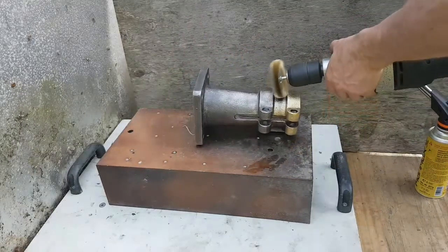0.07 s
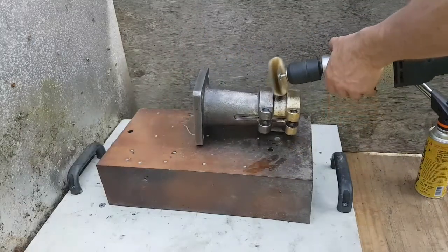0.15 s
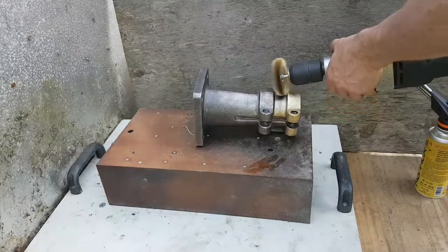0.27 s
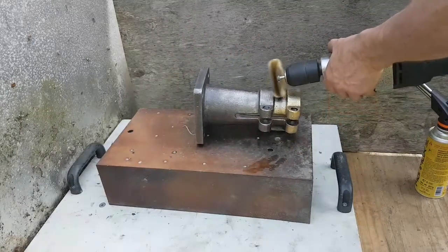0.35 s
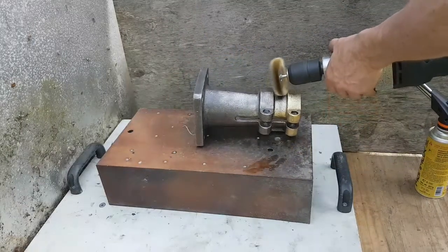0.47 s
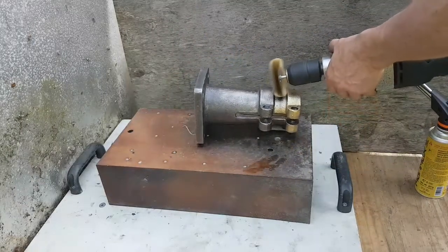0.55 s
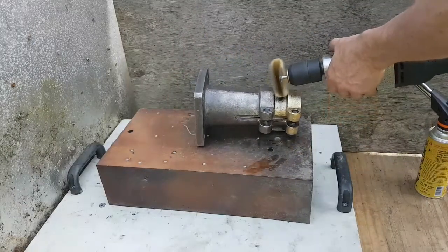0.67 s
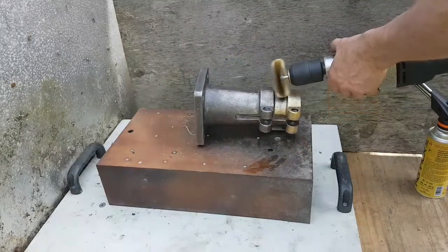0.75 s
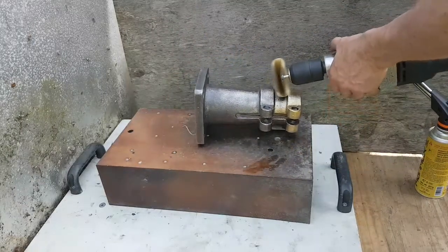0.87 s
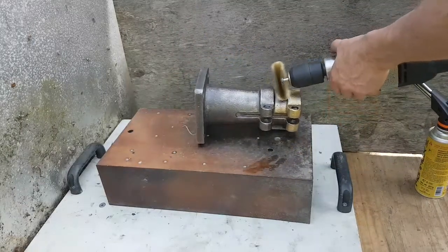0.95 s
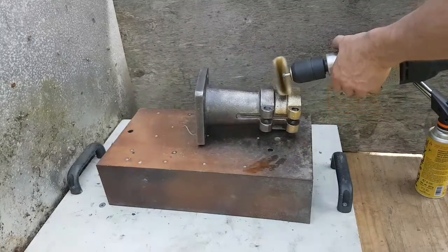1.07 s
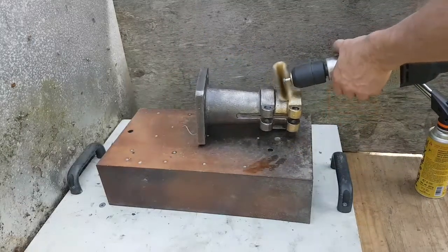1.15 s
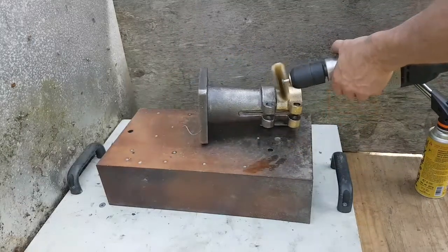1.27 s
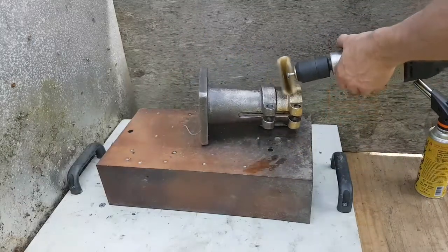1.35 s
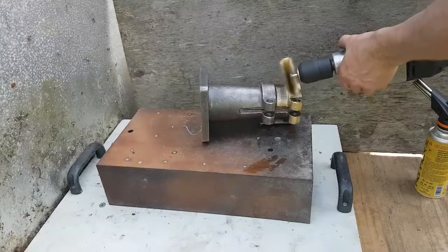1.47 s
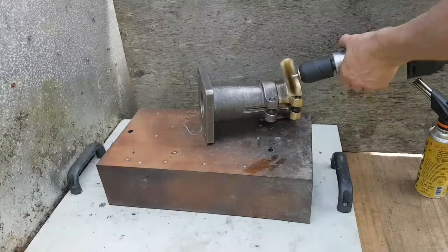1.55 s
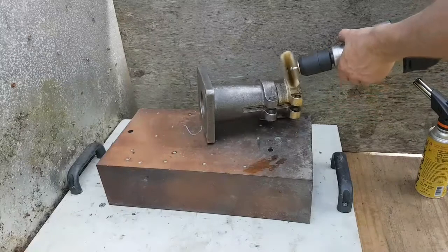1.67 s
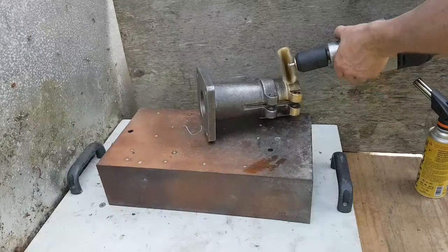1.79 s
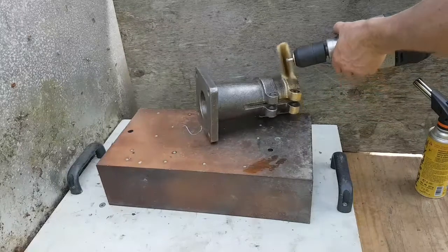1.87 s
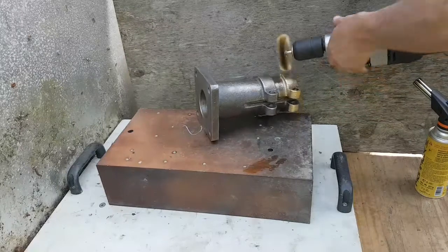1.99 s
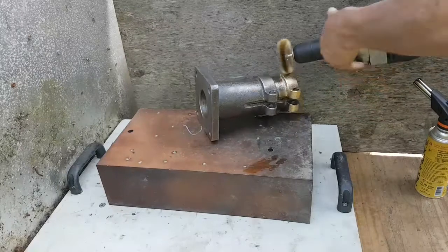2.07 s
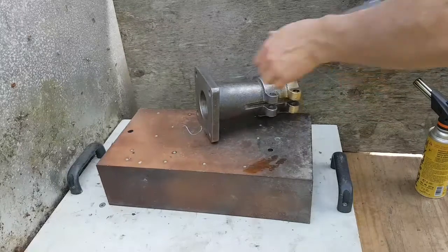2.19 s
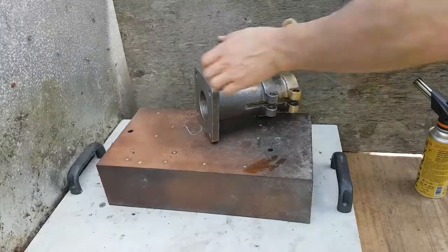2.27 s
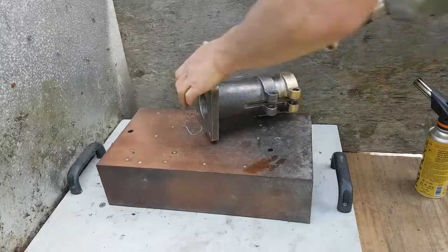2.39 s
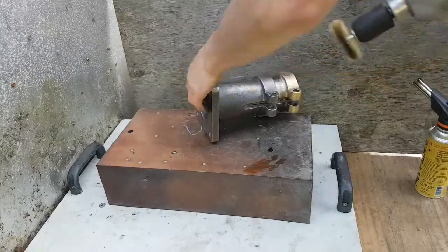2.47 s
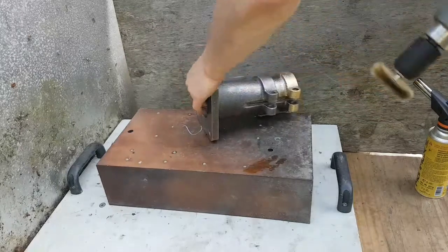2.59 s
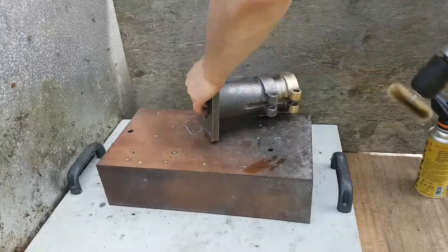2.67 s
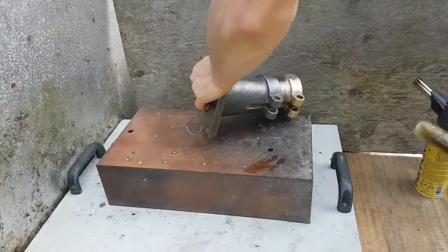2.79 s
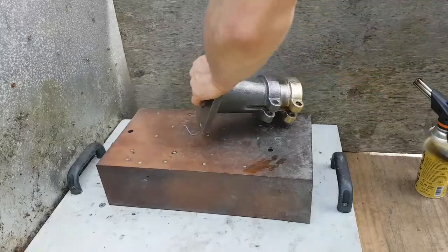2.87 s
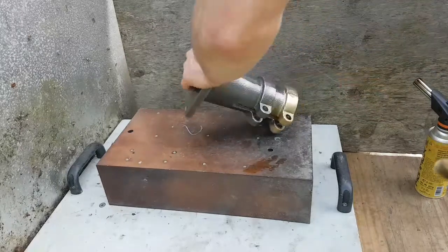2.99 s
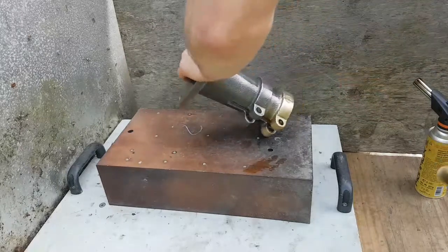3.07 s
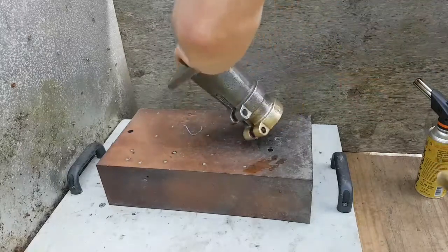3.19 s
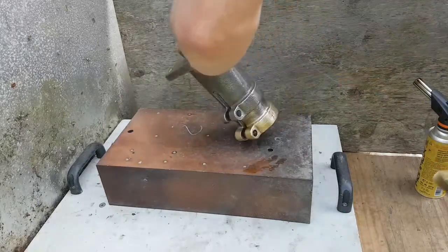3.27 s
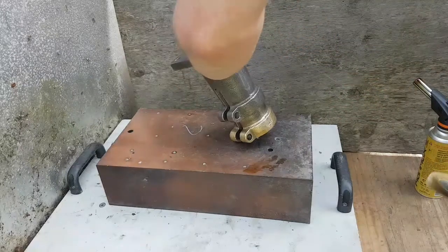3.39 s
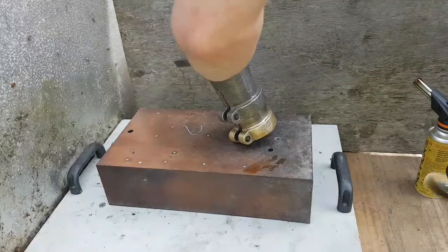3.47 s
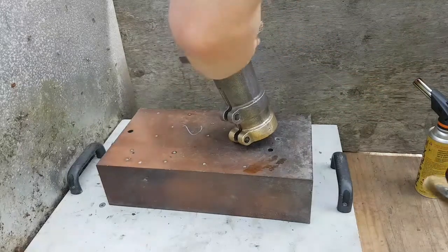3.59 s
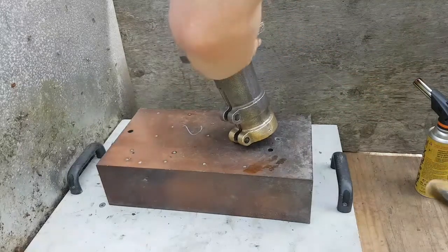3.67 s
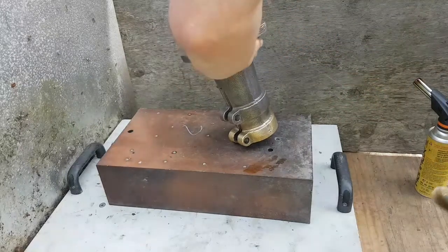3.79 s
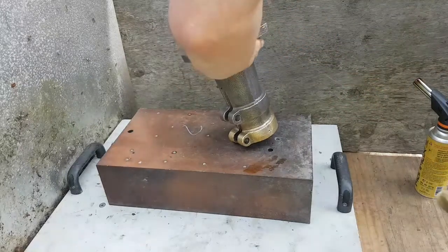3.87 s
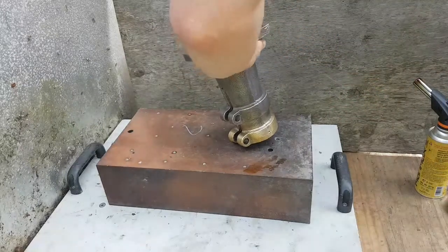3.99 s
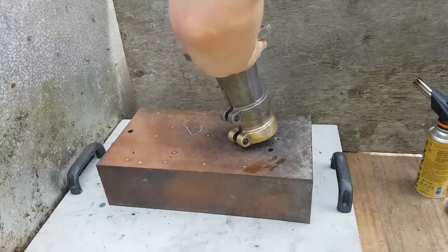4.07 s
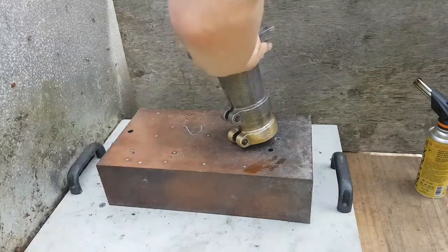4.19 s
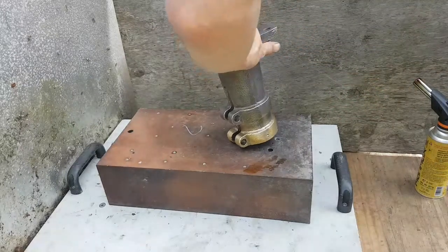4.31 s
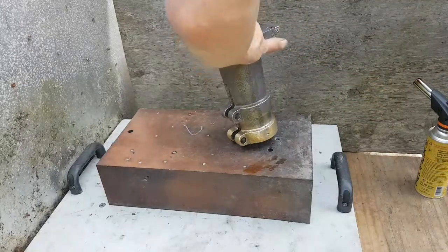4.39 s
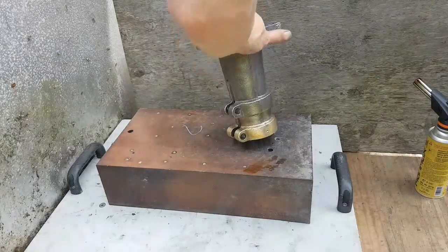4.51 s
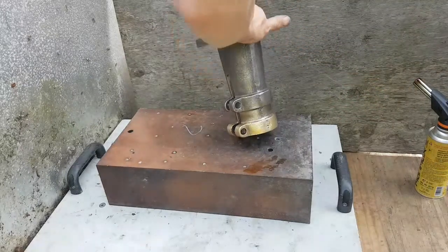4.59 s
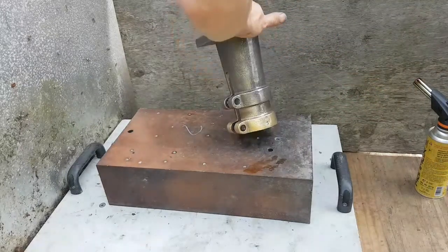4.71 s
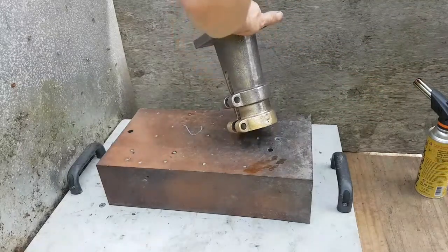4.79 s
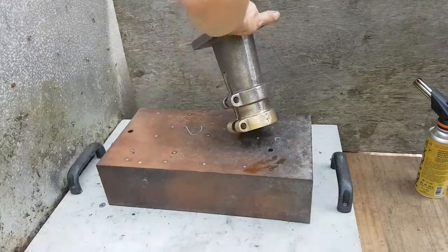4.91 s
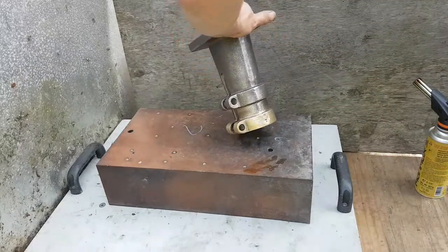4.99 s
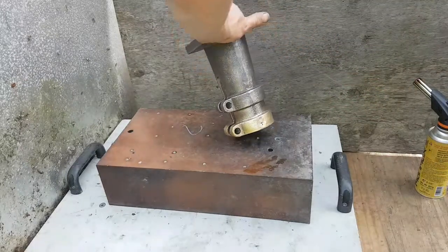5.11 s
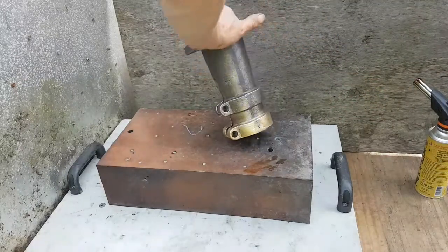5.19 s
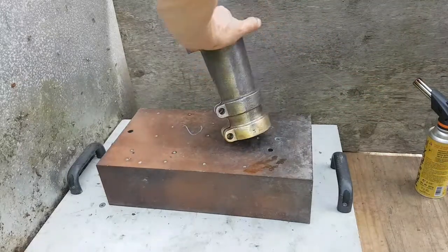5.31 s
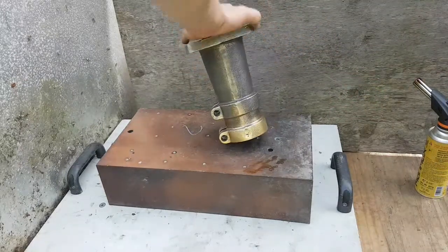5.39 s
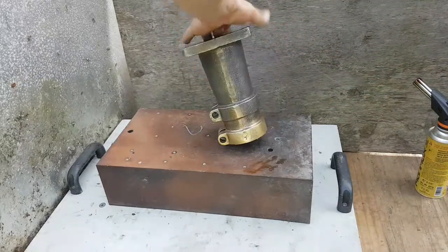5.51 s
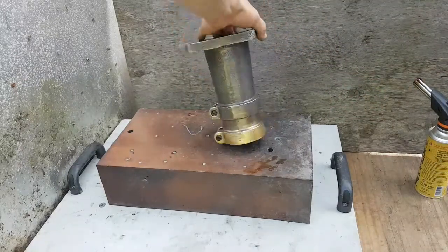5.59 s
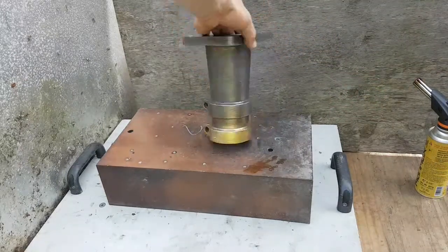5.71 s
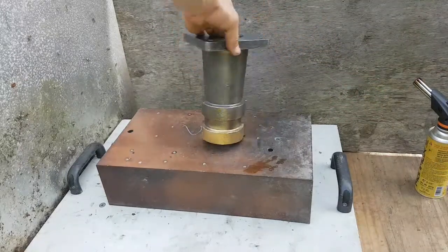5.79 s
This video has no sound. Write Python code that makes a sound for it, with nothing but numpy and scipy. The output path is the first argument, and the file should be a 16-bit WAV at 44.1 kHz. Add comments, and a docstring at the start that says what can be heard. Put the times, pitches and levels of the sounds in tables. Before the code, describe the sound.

From 0 to about 2 s a corded electric drill, right of a close stereo pair, runs at high speed: a piercing whine, a roaring motor and broad hissing air, its pitch sagging slightly whenever the wheel is pressed on. Wire tips rasp on a steel sleeve, which knocks dully against a hollow block, in a fast clatter until 0.65 s, then in scattered thuds, with a tight cluster near 1.9 s. At about 2.1 s the motor is released and glides steadily down, stopping near 4.2 s. Over it, the sleeve scrapes gritty and low from 1.9 to 3.8 s, with thumps near 2.8 and 3.25 s and a brief squeak around 3.3 s. Then the shop is nearly quiet, with faint taps and soft rubbing from 4.6 to 5.3 s. At 5.5, 5.64 and 5.77 s the rim lands with dull cracks, short scrapes and a metallic ring quickly damped. Short hard-walled reverberation.

```python
"""A corded drill whines and roars, its wire wheel rasping on a steel sleeve that thuds on a hollow block, right of
a pair of microphones. The trigger is let go, the motor coasts to rest while the drill is laid aside, and a hand
tips the sleeve up, drags it and stands it on end. Motor tones are sines locked to the turn rate, air and scraping
are coloured noise, wire ticks and blows excite decaying resonances."""
import sys
import numpy as np
from scipy import signal
from scipy.fft import rfft, irfft, next_fast_len
from scipy.io import wavfile
from scipy.ndimage import uniform_filter1d, map_coordinates

SR = 44100
rng = np.random.default_rng(int(sys.argv[2]) if len(sys.argv) > 2 else 0)


def wav_out(sig):
    """Save sig, one row per channel (or a flat mono array), as 16-bit PCM at SR to the path in sys.argv[1]."""
    wavfile.write(sys.argv[1], SR, np.round(np.clip(np.atleast_2d(sig).T, -1, 1) * 32767).astype(np.int16))


N = 257979

# colour of sleeve scraping: freq_hz, density_db (relative, per Hz)
SCRAPE_COLOUR = [(100, -12.5), (210, 5), (350, 2), (700, -17), (1000, -27), (3000, -62.5)]
# wires on the sleeve: time_s, level_db
BRUSHING_LEVEL = [(0, -29), (1.0, -26.5), (1.55, -29), (1.85, -32), (2.3, -84.5)]
# armature coasting after the trigger is let go: time_s, speed_turns_per_s
COAST_SPEED = [(2.07, 394), (2.2, 365.5), (2.8, 242.5), (3.0, 205), (3.52, 115), (3.77, 61.5), (3.89, 42),
               (4.18, 5), (4.22, 0)]


def amp(db):
    """Decibels to gain."""
    return 10 ** (np.asarray(db, float) / 20)


def rms_one(x):
    """Scale to unit rms."""
    return x / np.sqrt(np.mean(x ** 2) + 1e-20)


def in_time(rows):
    """Interpolate each column of a time table, sample by sample."""
    time_s, *columns = np.transpose(rows)
    return [np.interp(np.arange(N) / SR, time_s, column) for column in columns]


def at_hz(points, hz):
    """Read a frequency table on a log axis."""
    freq_hz, value = np.transpose(points)
    return np.interp(np.log(np.maximum(hz, 1)), np.log(freq_hz), value)


def coloured(x, spectrum):
    """Filter x by a gain curve in dB, zero phase."""
    size = next_fast_len(x.shape[-1] + SR)
    gain = amp(at_hz(spectrum, np.fft.rfftfreq(size, 1 / SR)))
    return irfft(rfft(x, size) * gain, size)[..., :x.shape[-1]]


def drift(rate_hz):
    """Slow random wander of unit rms: noise through a double pole, run at SR / 40."""
    pole = np.exp(-80 * np.pi * rate_hz / SR)
    white = rng.standard_normal(N // 40 + 2002)
    slow = signal.lfilter([1], [1, -2 * pole, pole * pole], white)[2000:]
    return np.interp(np.arange(N) / 40, np.arange(len(slow)), rms_one(slow))


def ring(clicks, hz, t60_s):
    """Two-pole resonator: a unit click starts a decaying sine of height 1."""
    r = amp(-60 / (t60_s * SR))
    w = 2 * np.pi * hz / SR
    return signal.lfilter([0, np.sin(w)], [1, -2 * r * np.cos(w), r * r], clicks + 1e-18)


def noise(spectrum, flicker_db, rate_hz):
    """Two unrelated noises of one colour that flicker together, closed off outside the table."""
    below, above = (spectrum[0][0] * .7, -60), (spectrum[-1][0] * 1.4, -60)
    closed = [below] + list(spectrum) + [above]
    return rms_one(coloured(rng.standard_normal((2, N)), closed) * amp(flicker_db * drift(rate_hz)))


def struck(time_s, blow_db, modes, spread_db):
    """Each blow excites each mode with a random strength; blow_db holds a row of blows per mode."""
    at, out = np.round(time_s * SR).astype(int), np.zeros(N)
    chance_db = rng.normal(0, spread_db, (len(at), len(modes)))
    for k, (hz, mode_db, t60_s) in enumerate(modes):
        clicks = np.zeros(N)
        clicks[at] = amp(blow_db[k] + mode_db + chance_db[:, k])
        out += ring(clicks, hz, t60_s)
    return out


def shop():
    """Quiet of the shop: steady coloured noise, unlike in the two ports."""
    # freq_hz, density_db (relative)
    shop_colour = [(30, -6.5), (81, 0.5), (243, -6.5), (787, -16.5), (1820, -13.5), (6540, -29.5),
                   (8950, -29), (15500, -38)]
    return amp(-54) * noise(shop_colour, flicker_db=0.31, rate_hz=4.6)


def bench():
    """Lumpy rumble and gritty scraping carried by the bench as the sleeve shifts on the block."""
    # start_s, length_s, deep_db, scrape_db
    drags = [(0.771, 1.15, -35.5, -58), (1.867, 0.67, -51.5, -36.5), (2.62, 0.67, -39, -34),
             (3.229, 0.2, -28.5, -41.5), (3.398, 0.44, -39, -42.5), (4.575, 0.05, -51, -49.5),
             (4.804, 0.38, -46, -52.5), (5.07, 0.22, -42.5, -54), (5.64, 0.065, -31.5, -31.5),
             (5.735, 0.095, -37.5, -29)]
    rest_db, attack_s, fade_db, release_s = -58, 0.015, -3.5, 0.016
    t, deep_gain, scrape_gain = np.arange(N) / SR, amp(rest_db), amp(rest_db)
    for start_s, length_s, deep_db, scrape_db in drags:
        attack = np.clip((t - start_s) / attack_s, 0, 1)
        fade = amp(fade_db * np.clip((t - start_s) / length_s, 0, 1))
        release = np.exp(-np.maximum(t - start_s - length_s, 0) / release_s)
        shape = attack * fade * release
        deep_gain = deep_gain + amp(deep_db) * shape
        scrape_gain = scrape_gain + amp(scrape_db) * shape
    # grains caught under the sleeve; level relative to the scrape
    grains_per_s, grit_db, grit_band_hz = 170, -11, [247, 760]
    grains = (rng.random(N) < grains_per_s / SR) * rng.standard_normal(N)
    band = signal.butter(4, grit_band_hz, "band", fs=SR, output="sos")
    grit = amp(grit_db) * rms_one(signal.sosfilt(band, grains + 1e-18))
    rumble = noise([(25, -17.5), (80, -5.5), (150, -4.5)], flicker_db=4.5, rate_hz=7)
    scrape = noise(SCRAPE_COLOUR, flicker_db=4.3, rate_hz=40)
    return deep_gain * rumble + scrape_gain * (scrape + grit)


def room(x):
    """A small hard corner: x smeared by a decaying noise tail of its own in each port."""
    t60_s = 0.4
    t = np.arange(round(.4 * SR)) / SR
    tail = rng.standard_normal((2, len(t))) * amp(-60 * t / t60_s) * (t > .004)
    tail /= np.sqrt(np.sum(tail ** 2, axis=1, keepdims=True))
    return signal.fftconvolve(x, tail, axes=1)[:, :N]


def squeak():
    """Two close steady tones while the rim drags."""
    # start_s, end_s, [(pitch_hz, level_db)]
    squeak_tones = (3.268, 3.395, [(1251, -35), (1376, -29.5)])
    start_s, end_s, tones = squeak_tones
    t = np.arange(N) / SR
    gate = np.clip(np.minimum(t - start_s, end_s - t) / 0.016, 0, 1)
    return gate * sum(amp(db + 2.0 * drift(25)) * np.sin(2 * np.pi * hz * t) for hz, db in tones)


def landings():
    """The rim lands upright: a dull crack of noise, and the steel tube's modes ring."""
    # time_s, crack_db, low_modes_db, high_modes_db
    blows = [(5.495, -23, -53, -45), (5.639, -38, -30.5, -44), (5.763, -33, -28, -42.5)]
    # mode_hz, level_db (relative), t60_s
    sleeve_modes = [(953, -31, 0.3), (1398, 0.5, 0.11), (2128, -18.5, 1), (2170, -16, 0.068),
                    (2620, -28, 0.19), (3130, -27, 0.37), (3540, -15, 0.18), (4160, -13.5, 0.19),
                    (4400, -17.5, 0.35), (5660, -14, 0.12), (6100, -18, 0.15), (6400, -17, .5),
                    (6715, -20, 0.19), (7280, -22, 0.3)]
    # freq_hz, gain_db
    crack_colour = [(1500, 1.5), (6500, -37), (8000, -48)]
    time_s, crack_db, low_db, high_db = np.transpose(blows)
    blow_db = [low_db if hz < 2800 else high_db for hz, _, _ in sleeve_modes]
    out = struck(time_s, blow_db, sleeve_modes, spread_db=3.0)
    # the rim comes to rest and the ring is damped
    settles_s, settle_t60_s = 5.8, 0.12
    out *= amp(-60 * np.maximum(np.arange(N) / SR - settles_s, 0) / settle_t60_s)
    attack_s, decay_s = 0.0014, 0.014
    t = np.arange(3000) / SR
    cracks = coloured(rng.standard_normal((len(time_s), 3000)), crack_colour)
    cracks *= np.exp(-t / decay_s) * (1 - np.exp(-t / attack_s))
    for i, db, crack in zip(np.round(time_s * SR).astype(int), crack_db, cracks):
        out[i:i + 3000] += amp(db) * crack
    return out


def knocks():
    """Sleeve on block: a dull push that swells for a few ms, a gritty puff, and the block's modes."""
    # time_s, level_db, thud_hz
    contacts = [(0.055, -14, 355), (0.093, -19, 342), (0.157, -19.5, 283), (0.203, -18, 214),
                (0.282, -17, 340), (0.325, -18.5, 265), (0.388, -17, 286), (0.444, -16, 366),
                (0.518, -14.5, 328), (0.557, -19, 332), (0.632, -16.5, 391), (0.876, -23, 199),
                (0.919, -19, 204), (1.265, -15, 284), (1.308, -14, 169), (1.526, -16, 284),
                (1.588, -13, 215), (1.869, -13, 230), (1.892, -12, 222), (1.955, -19, 220),
                (1.972, -19, 220), (2.838, -17.5, 245), (3.254, -17, 184), (3.358, -26, 153),
                (3.541, -29.5, 163), (3.762, -25.5, 317), (4.57, -38.5, 345), (4.714, -47, 525),
                (4.975, -48, 655), (5.081, -37.5, 303), (5.132, -36, 520), (5.241, -42, 200),
                (5.498, -15, 333), (5.637, -20.5, 352), (5.769, -23.5, 228)]
    # mode_hz, level_db (relative), t60_s
    block_modes = [(219, -18, 0.28), (562, -14.5, 0.12), (751, -13, 0.07)]
    thud_t60_s, swell_s, puff_decay_s, puff_db = 0.072, 0.004, 0.014, -3.5
    time_s, level_db, thud_hz = np.transpose(contacts)
    out = struck(time_s, [level_db] * len(block_modes), block_modes, spread_db=5.0)
    t = np.arange(4000) / SR
    puffs = rms_one(coloured(rng.standard_normal((len(time_s), 4000)), SCRAPE_COLOUR))
    puffs = puffs * np.exp(-t / puff_decay_s)
    swell = 1 - np.exp(-t / swell_s)
    for i, db, hz, puff in zip(np.round(time_s * SR).astype(int), level_db, thud_hz, puffs):
        thud = np.sin(2 * np.pi * hz * t) * amp(-60 * t / thud_t60_s)
        contact = amp(db) * (thud + amp(puff_db) * puff) * swell
        out[i:i + 4000] += contact[:N - i]
    return out


def speed():
    """Armature turns per second: each press pulls the motor down, then it recovers; at last it coasts."""
    # wheel pressed on the sleeve: start_s, loss_turns_per_s
    presses = [(-.2, 19.6), (.043, 7.3), (.302, 7.6), (.53, 7.6), (.735, 8.9), (.92, 9.3), (1.154, 10),
               (1.447, 7.5), (1.761, 5.7)]
    free_turns_per_s, bite_s, recover_s = 408.2, .123, .579
    t, sag = np.arange(N) / SR, 0
    for start_s, loss in presses:
        bite = np.clip((t - start_s) / bite_s, 0, 1)
        sag = sag + loss * bite * np.exp(-np.maximum(t - start_s - bite_s, 0) / recover_s)
    powered = t < COAST_SPEED[0][0]
    return uniform_filter1d(np.where(powered, free_turns_per_s - sag, in_time(COAST_SPEED)[0]), size=1500)


def loudness(full_db, knee_turns_per_s, steepness, side):
    """Gain of a drill noise: dies under the knee speed, shifts with the side that the drill shows."""
    # drill turned: start_s, end_s, ramp_s, roar_db, whirr_db, rush_db, hiss_db (changes; side picks one)
    turned = [(2.623, 4.6, 0.46, -5.5, 1.4, -1, -1), (3.19, 3.42, 0.038, -0.5, 0.094, -2, -5.5),
              (3.665, 4.6, 0.01, -3, -1.3, -6, -7.5)]
    t, turns, top = np.arange(N) / SR, speed(), COAST_SPEED[0][1]
    side_db = sum(db[side] * np.clip(np.minimum(t - start_s, end_s - t) / ramp_s, 0, 1)
                  for start_s, end_s, ramp_s, *db in turned)
    # unity at the speed where coasting starts
    ratio = turns / (turns + knee_turns_per_s) * (top + knee_turns_per_s) / top
    return amp(full_db + side_db) * ratio ** steepness


def air_noise():
    """Roar, whirr, air rush and its hissing top: noise bands that follow the motor's speed."""
    # each: freq_hz, density_db (relative)
    roar_colour = [(200, -9), (450, -12), (620, -3), (780, 0), (960, 4), (1200, -4), (1500, -4)]
    whirr_colour = [(1200, -6), (1750, -5), (1950, 0), (2550, -1.5), (3000, -5.5), (4000, -16.5)]
    rush_colour = [(3000, -3.5), (4600, 4.5), (5400, 4), (7000, 2), (9000, -7)]
    hiss_colour = [(10000, 4.5), (15500, -1)]
    rush_law = dict(full_db=-21.5, knee_turns_per_s=151, steepness=1.38)
    hiss_db = -5  # relative to the rush
    roar = loudness(-23.5, 410, 0.9, side=0) * noise(roar_colour, 1.27, 24)
    whirr = loudness(-23, 66, 1.32, side=1) * noise(whirr_colour, 1.0, 26)
    rush = loudness(**rush_law, side=2) * noise(rush_colour, 0.93, 22)
    hiss = loudness(**rush_law, side=3) * amp(hiss_db) * noise(hiss_colour, 1.2, 24)
    return roar + whirr + rush + hiss


def brush():
    """Wire tips tick on the sleeve at random and keep its resonances sounding."""
    # pitch_hz, width_hz, level_db (relative)
    brushed_modes = [(1380, 130, -1.5), (1980, 134, 1), (2970, 80, -14), (4620, 140, -16.5)]
    wires_per_s = 900
    hits = rng.random((2, N)) < wires_per_s / SR
    ticks = hits * rng.standard_normal((2, N)) * amp(3.0 * drift(20))
    rings = 0
    for k, (hz, width_hz, db) in enumerate(brushed_modes):
        t60_s = np.log(1000) / (np.pi * width_hz)
        rings = rings + (-1) ** k * amp(db) * rms_one(ring(ticks, hz, t60_s))
    return amp(in_time(BRUSHING_LEVEL)[0]) * rings


def motor_lines():
    """Sines locked to the armature: fan whine, turn orders through the housing, loaded gear mesh."""
    # fan whine as its pitch falls: pitch_hz, level_db
    whine_path = [(800, -65), (1550, -27), (2100, -37), (4300, -43), (5600, -34), (8000, -29), (11000, -35),
                  (11800, -30), (12150, -23)]
    # whine drops out briefly: centre_s, half_length_s
    whine_dips = [(.03, .09), (.625, .045), (.9, .07), (1.7, .04)]
    # housing resonances: freq_hz, gain_db
    housing = [(120, -9), (400, -9.5), (560, -19), (800, -3), (1400, 2), (2080, 12), (2500, -2), (2900, -8),
               (3700, -11), (4700, -5), (6800, -3), (9200, -26), (11300, -5), (14500, -26)]
    # unbalance, gear teeth, commutator bars: multiples of the turn rate
    turn_orders = [1, 2, 6, 10, 12, 15, 20, 24, 48, 72]
    # level_db of each order, before the housing
    order_levels = [-29.5, -32.5, -43, -33, -38, -36, -31, -27.5, -27, -26]
    fan_blades, dip_db = 31, -20
    force_turns_per_s, force_power = 250, 1.1  # orders weaken under this speed
    mesh_order, mesh_db = 3.875, 1.5  # gear tone while the wheel is pressed on; relative to BRUSHING_LEVEL
    turns_hz, t = speed(), np.arange(N) / SR
    phase = 2 * np.pi * np.cumsum(turns_hz) / SR

    dips = sum(np.clip(2 - 2 * np.abs(t - centre_s) / half_s, 0, 1) for centre_s, half_s in whine_dips)
    whine_db = at_hz(whine_path, fan_blades * turns_hz) + dip_db * dips
    out = amp(whine_db + 3.5 * drift(15)) * np.sin(fan_blades * phase + .6 * drift(66))

    force = np.clip(turns_hz / force_turns_per_s, 0, 1) ** force_power
    for k, db in zip(turn_orders, order_levels):
        level = force * amp(db + at_hz(housing, k * turns_hz) + 2.5 * drift(12))
        out += level * np.sin(k * phase + 0.14 * np.sqrt(k) * drift(66))

    mesh_level = amp(in_time(BRUSHING_LEVEL)[0] + mesh_db + 2.2 * drift(12))
    out += mesh_level * np.sin(mesh_order * phase + .7 * drift(30))
    return np.sqrt(2) * out


def drill():
    """Sound from the drill's side: the left port hears it late, shaded and mixed with scattered sound."""
    # time_s, left_lag_samples, left_minus_right_db (before the shadow)
    place = [(0, 8.43, -5), (2.3, 9.56, -5), (3.2, 15.7, -3.5), (4.3, 13.4, -4)]
    # freq_hz, share of noise power unlike in the ports
    diffuse = [(300, 0.26), (1000, 0.42), (2500, 0.87), (12000, 1)]
    # freq_hz, gain_db
    left_shadow = [(300, -1.5), (800, 1), (2400, -2), (4400, -4.5), (7000, -8.5), (9000, 6.5), (12000, -4)]
    lag, pan_db = in_time(place)
    direct, scattered = air_noise() + brush()
    hz, share = np.transpose(diffuse)
    share = np.clip(share, .02, .98)
    left = coloured(direct, np.c_[hz, 10 * np.log10(1 - share)])
    left = left + coloured(scattered, np.c_[hz, 10 * np.log10(share)])
    lines = motor_lines()
    late = map_coordinates(left + lines, [np.arange(N) - lag], order=3, mode="nearest")
    return np.array([coloured(late, left_shadow) * amp(pan_db / 2), (direct + lines) * amp(-pan_db / 2)])


def scene():
    """Shop, bench, sleeve with its reverberation, and drill."""
    thuds, rings = knocks() + squeak(), landings()
    thud_room_db, ring_room_db = -7, -14
    wet = room((amp(thud_room_db) * thuds + amp(ring_room_db) * rings)[None])
    sleeve = (thuds + rings) * amp([[-1.2], [1.2]])  # a little to the right
    return shop() + bench() + wet + sleeve + drill()


def record(dry):
    """The microphone ports have a notch near 9 kHz; peaks are rounded, the top is cut."""
    # freq_hz, gain_db
    port_notch = [(7700, 1.5), (8500, -8.5), (10000, -9), (11800, 0.5)]
    cutoff_hz = 15880
    low_pass = signal.cheby2(24, 60, cutoff_hz, fs=SR, output="sos")
    return signal.sosfilt(low_pass, np.tanh(coloured(dry, port_notch)))


dry = scene()
out = record(dry)
wav_out(out)
```